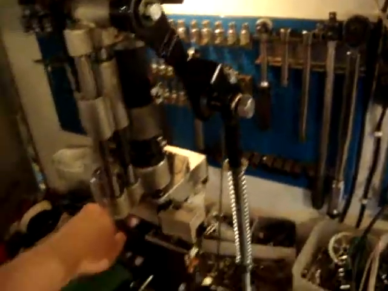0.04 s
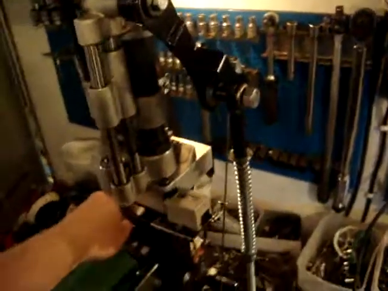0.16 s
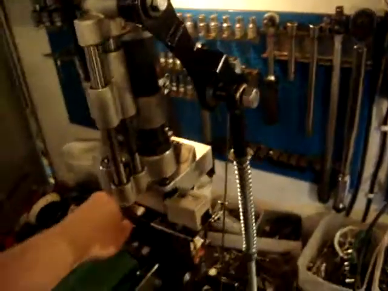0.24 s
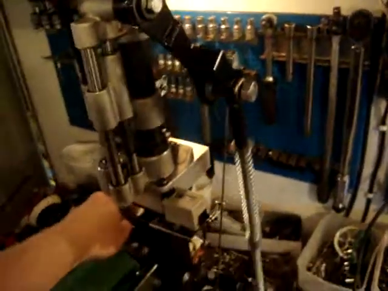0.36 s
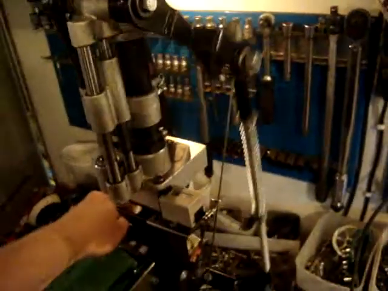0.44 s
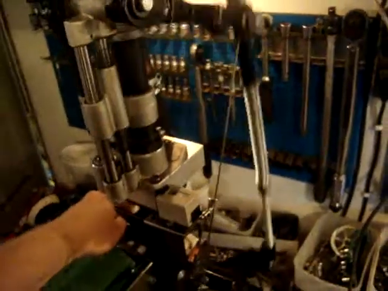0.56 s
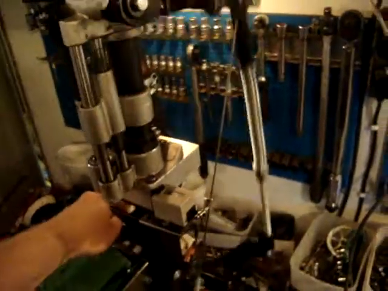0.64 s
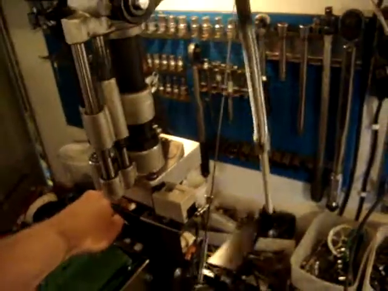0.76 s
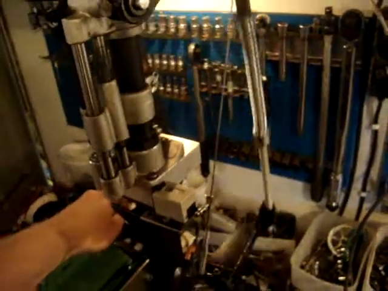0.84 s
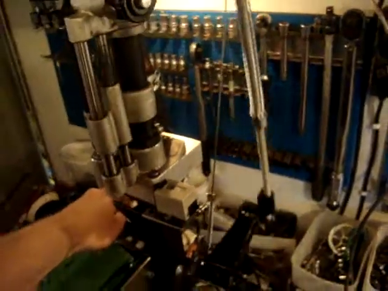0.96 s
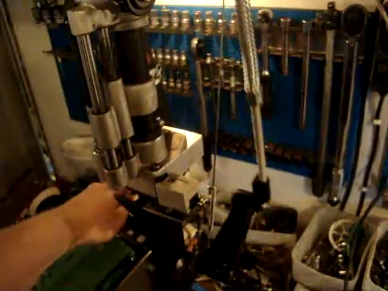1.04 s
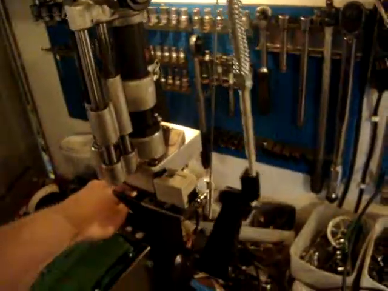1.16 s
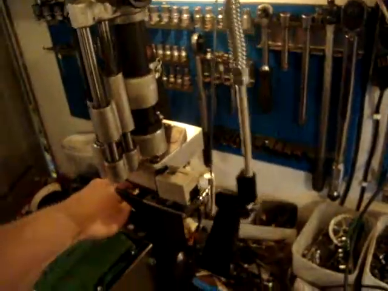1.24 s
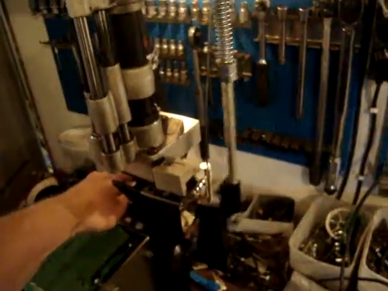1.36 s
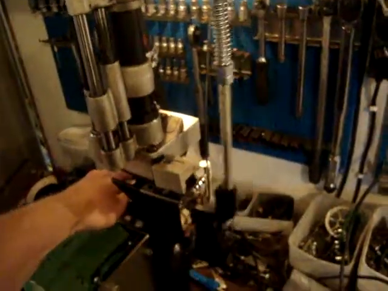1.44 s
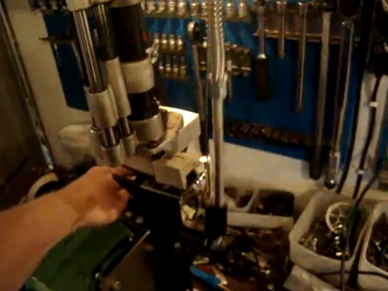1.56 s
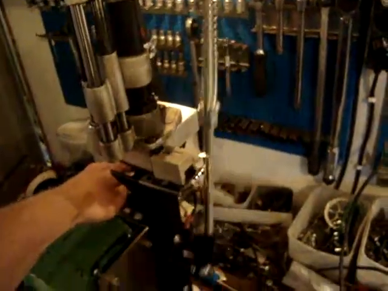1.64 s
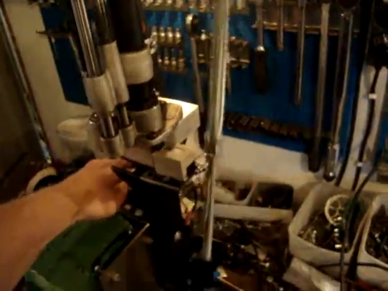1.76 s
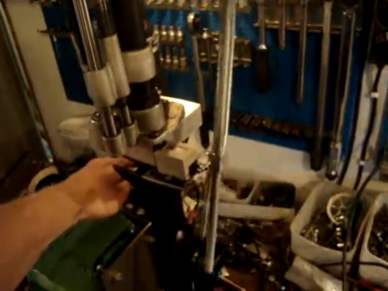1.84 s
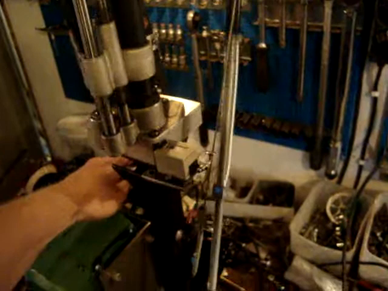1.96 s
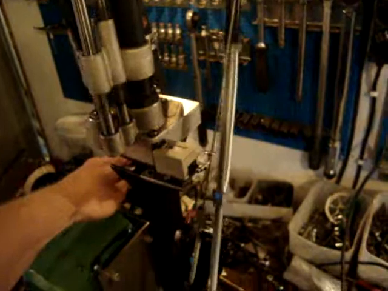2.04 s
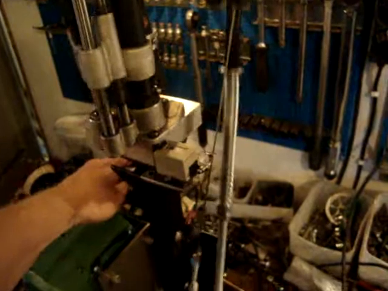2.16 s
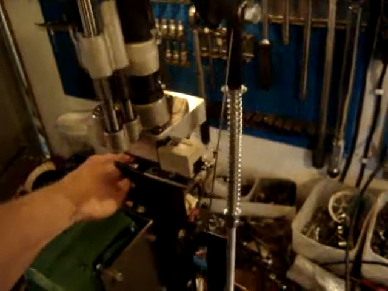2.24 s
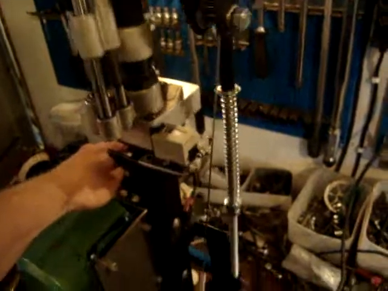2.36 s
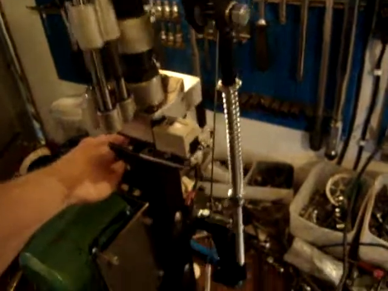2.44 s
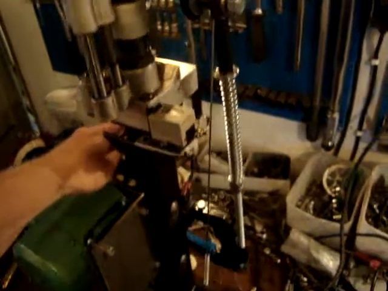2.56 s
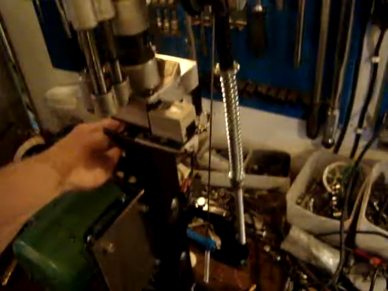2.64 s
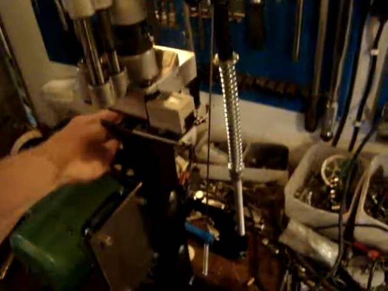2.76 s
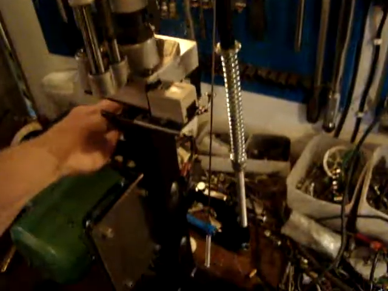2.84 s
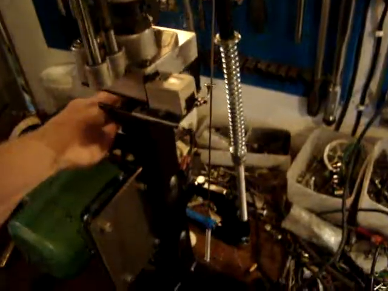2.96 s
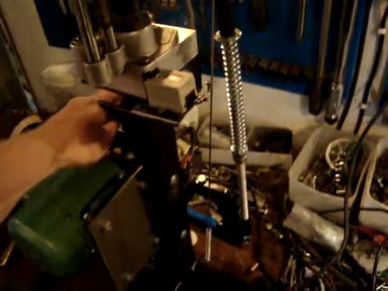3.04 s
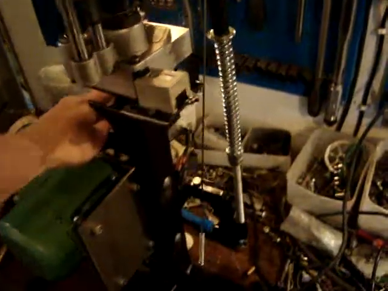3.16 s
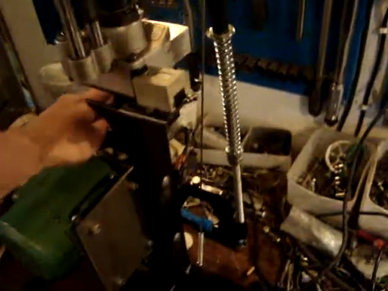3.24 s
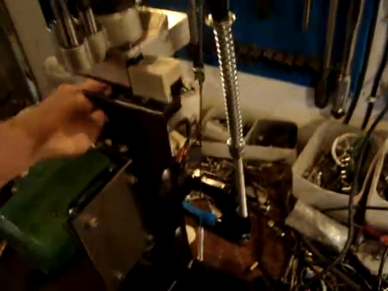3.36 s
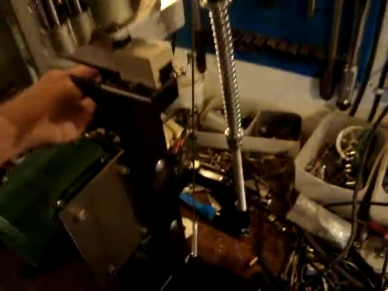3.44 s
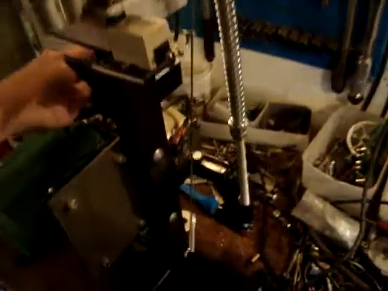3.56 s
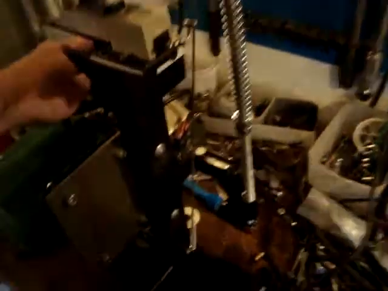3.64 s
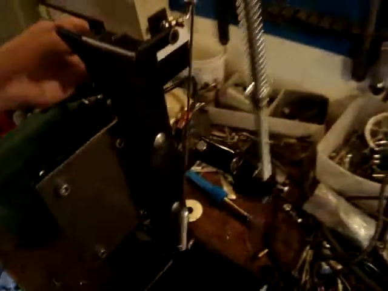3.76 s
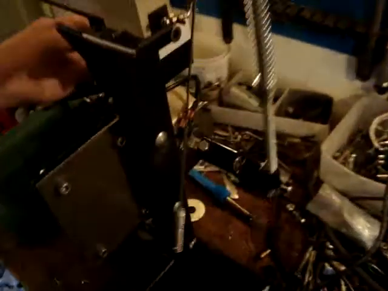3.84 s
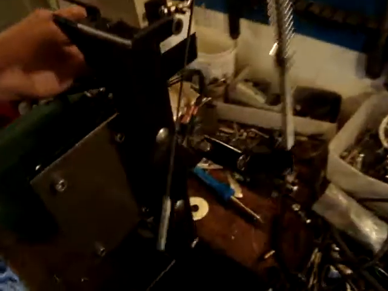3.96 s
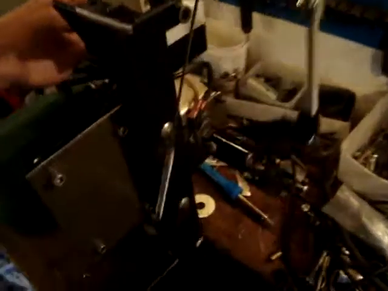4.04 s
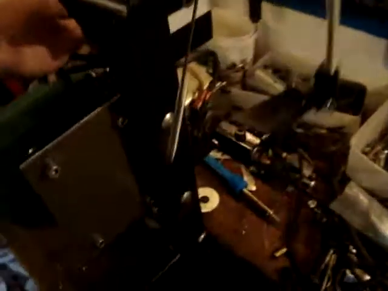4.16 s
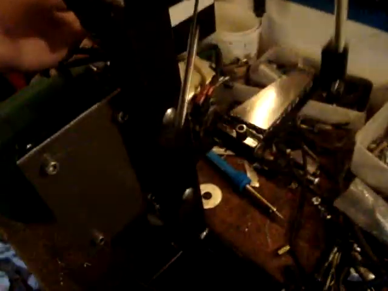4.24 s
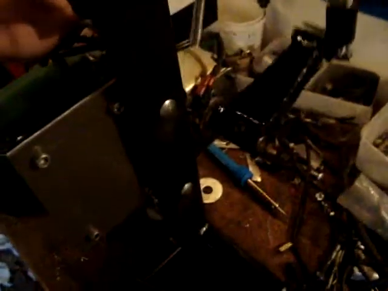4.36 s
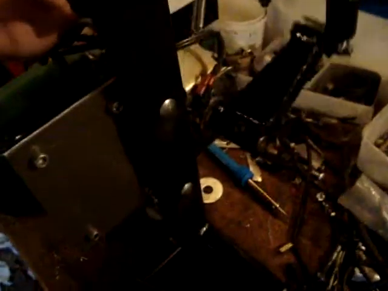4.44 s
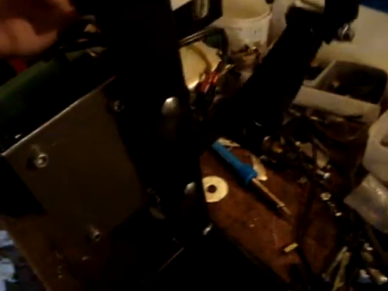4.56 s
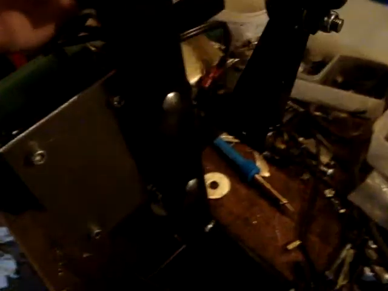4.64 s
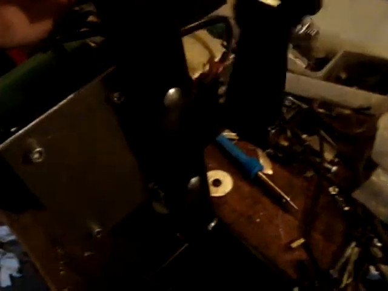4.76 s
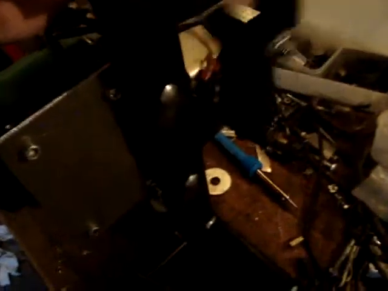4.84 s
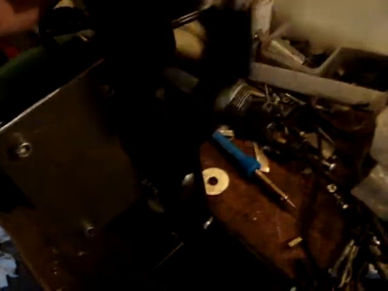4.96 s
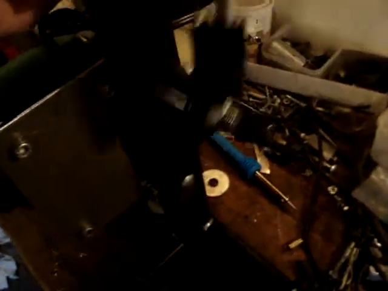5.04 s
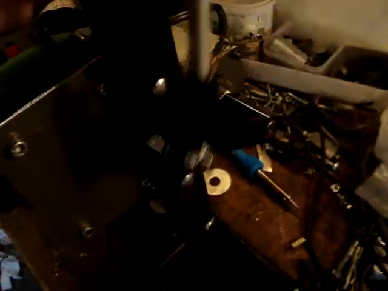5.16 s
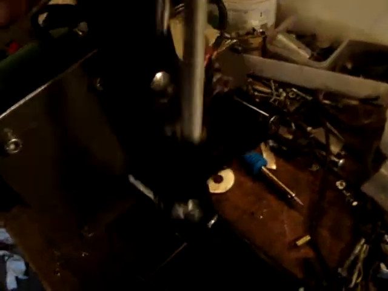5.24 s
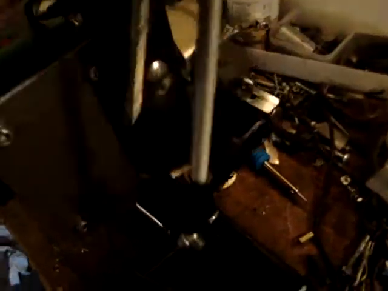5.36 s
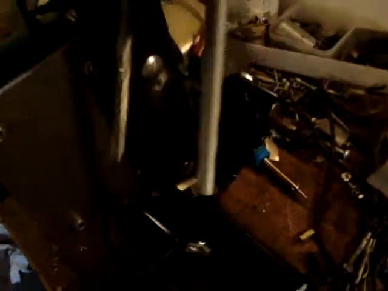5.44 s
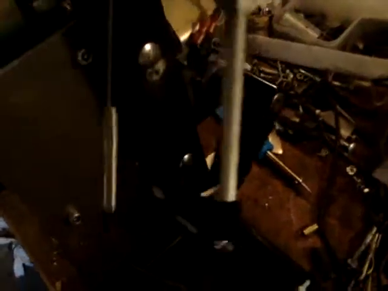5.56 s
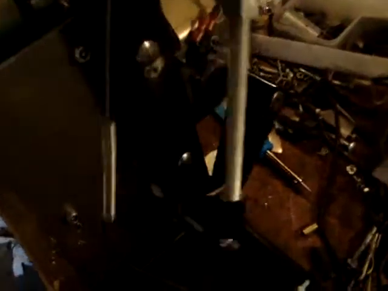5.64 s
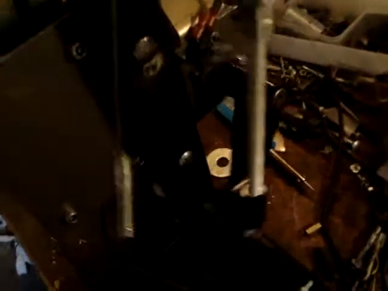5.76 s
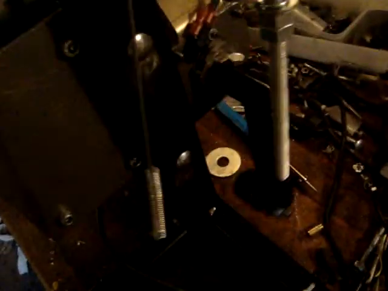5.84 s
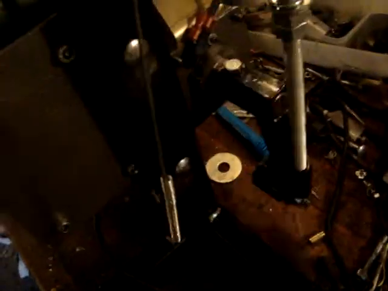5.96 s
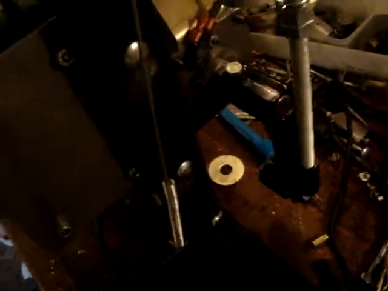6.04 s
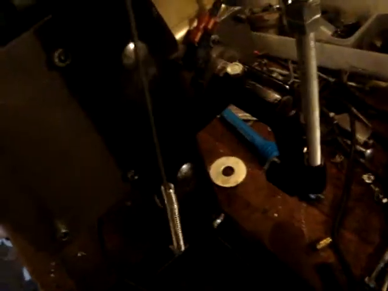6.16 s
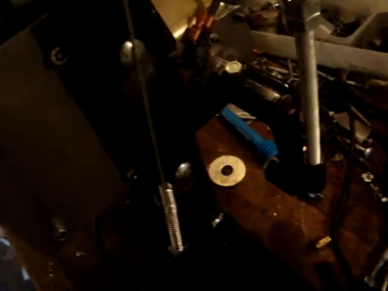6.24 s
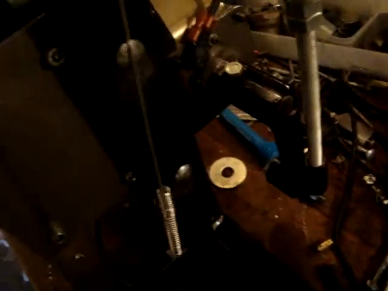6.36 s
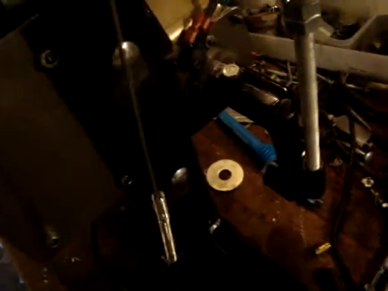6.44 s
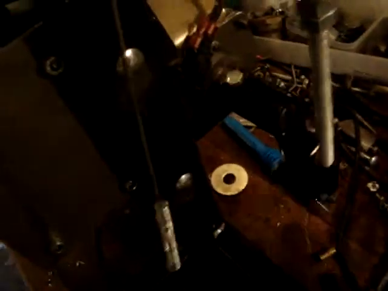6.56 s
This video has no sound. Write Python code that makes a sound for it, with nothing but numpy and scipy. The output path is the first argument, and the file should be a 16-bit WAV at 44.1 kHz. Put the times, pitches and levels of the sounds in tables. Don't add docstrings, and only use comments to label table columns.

```python
import sys
import numpy as np
from scipy import signal
from scipy.fft import rfft, irfft
from scipy.io import wavfile
from scipy.ndimage import uniform_filter1d, minimum_filter1d

SR = 44100
rng = np.random.default_rng(int(sys.argv[2]) if len(sys.argv) > 2 else 0)


def nominal_scale(level):
    x = np.asarray(level, float) / 20
    return 10 ** x


def master(y):
    cut = np.clip(np.atleast_2d(y).T, -1, 1)
    pcm = np.round(cut * 32767)
    wavfile.write(sys.argv[1], SR, pcm.astype(np.int16))


N = 291060
T = np.arange(N) / SR
MOVED_S = 3.2
ENGAGE_S, PRESS_S, RELEASE_S, CUT_S = .12, .79, 1.56, 2.26
# switch_on_s, rest_angle_turns, turns lost under load
STROKES = [
    (.18, 0, .31),
    (3.65, -3.58, .16),
    (6.52, -9.5, .2),
]
# after_switch_on_s, level_db
STILL = [(-.03, -25), (.013, -25), (.021, 0), (2.8, 0)]


def placed(far, near):
    return np.where(T < MOVED_S, far, near)


def unit(x):
    return x / np.sqrt(np.mean(x ** 2))


def unit_each_place(x):
    before, after = (np.sqrt(np.mean(x[part] ** 2)) for part in (T < MOVED_S, T >= MOVED_S))
    return x / placed(before, after)


def walk(rate):
    k = int(SR / rate)
    held = np.repeat(rng.standard_normal(N // k + 1), k)
    return unit(uniform_filter1d(uniform_filter1d(held, k), k)[:N])


def band(x, hz, width):
    return signal.lfilter(*signal.iirpeak(hz, hz / width, SR), x)


def ring(x, modes):
    y = 0
    for k, (hz, width, far_db, near_db) in enumerate(modes):
        y = y + (-1) ** k * nominal_scale(placed(far_db, near_db)) * band(x, hz, width)
    return unit_each_place(y)


def colour(x, points):
    hz, db = np.transpose(points[:-2])
    f = np.maximum(np.arange(N // 2 + 1) * SR / N, 1)
    return unit(irfft(rfft(x) * nominal_scale(np.interp(np.log(f), np.log(hz), db)), N))


def curves(tables, edge_s=0.0045):
    rows = np.vstack(tables)
    gate = sum((T >= t[0][0]) & (T <= t[-1][0]) for t in tables)
    return uniform_filter1d(1. * gate, int(edge_s * SR)), [np.interp(T, rows[:, 0], c) for c in rows.T[1:]]


def stroke_times(s):
    return np.hstack([on + s for on, _, _ in STROKES])


def cycle(rows):
    s, value = np.transpose(rows)
    return np.interp(T, stroke_times(s), np.tile(value, len(STROKES)))


def staged(dbs, step_s=0.0037):
    *stage, moved = dbs
    ends = [0, ENGAGE_S, PRESS_S, RELEASE_S, CUT_S, CUT_S + .5]
    rows = [(s, db) for a, b, db in zip(ends, ends[1:], stage) for s in (a, b - step_s)]
    return cycle(rows) + cycle(STILL) + moved * (T >= MOVED_S)


def effort():
    # time_s, casing_level_db
    powered = [
        [(.205, -30.5), (.27, -29.5), (.53, -27), (.96, -26.5), (.99, -24), (1.4, -28.5), (1.68, -26.5),
         (1.83, -31), (2.43, -29)],
        [(3.675, -34.5), (3.83, -27), (4.42, -25), (4.47, -21.5), (4.83, -30.5), (5.15, -28), (5.25, -33),
         (5.77, -28), (5.9, -29.5)],
        [(6.553, -27), (6.6, -32.5)],
    ]
    # from_first_effort_s, relative_db
    onset = [(-.027, -44), (-.02, -6.5), (-.006, -2)]
    # after_cut_s, relative_to_last_effort_db
    coast = [(.03, -1), (.18, -16), (.28, -32), (.37, -47)]

    def around(row, shape):
        return [(row[0] + s, row[1] + db) for s, db in shape]

    gate, (db,) = curves([around(e[0], onset) + e + around(e[-1], coast) for e in powered])
    return gate, db


def motor():
    # spin_up_db, lift_db, press_db, return_db, coast_db, added_second_place_db
    drone_stages = (-18.5, -8.5, -12, -14.5, -13.5, -2.5)
    cover_stages = (-12, -7, -7.5, -10, -14, 1.5)
    gears_stages = (-20, -6.5, -8, -6.5, -10.5, 1)
    gears_near_stages = (7, 1, 0.5, -2, -2.5, 0.5)
    casing_stages = (-0.5, 0.5, -0.5, -0.5, -1.5, -0.5)
    ring_stages = (-50, -49, -50, -50, -4.5, -0.5)
    # first_place_hz, second_place_hz
    ring_hz = (900, 883)
    # pitch_hz, width_hz, first_place_db, second_place_db
    casing_modes = [(888, 21.7, 6, -24), (957.4, 51.5, 0, -1.5), (838, 134, -10, 4.5), (1024, 91, -30, 2)]
    cover_modes = [(1134, 33, 8.5, 14), (1330, 19, -2.5, -16), (1244, 190, -0.5, 8)]
    gear_modes = [(1687, 121, -4, -7.5), (1903, 270, -6.5, -10), (2084, 54, 2.5, 0),
                  (2187, 25.6, 0.5, -1.5), (2365, 71, -9.5, -9.5)]
    base_modes = [(198, 56, -15.5, -11), (288.5, 29, -6, -5), (420.2, 35, 1.5, -0.5), (522, 90, -3, -1.5),
                  (637, 98, 2, 0)]
    # time_s, throb_depth
    throb = [
        [(.45, 0.044), (.56, 0.92), (.72, 0.56), (1.2, 0.1), (1.45, 0.68), (1.7, 0.3), (1.95, 0.74),
         (2.2, 0.72), (2.48, 0.42)],
        [(3.8, 0.48), (4.1, 0.54), (4.5, 0.46), (4.9, 0.5), (5.3, 0.29), (5.42, 0.59), (5.85, 0.55),
         (5.9, 0.04), (6.6, 0.14)],
    ]
    # after_switch_on_s, pull_0_to_1
    winding_pull = [(.04, 0.04), (.13, 0.73), (.77, 0.93), (.86, 0), (1.56, 0.16), (1.66, 0.2),
                    (2.22, 0.37), (2.3, 0.1)]
    # pitch_hz, level_db
    mains = [(50, -70), (100, -56.5), (200, -53), (300, -50.5)]

    gate, casing_db = effort()
    drone_db, cover_db, gears_db = (casing_db + staged(dbs) for dbs in (drone_stages, cover_stages, gears_stages))
    gears_db = gears_db + (T >= MOVED_S) * (staged(gears_near_stages) - cycle(STILL))

    angle = shaft()
    spot = (angle + .27) % 1
    uneven = nominal_scale(.6 * rng.standard_normal(170))[(angle + .6).astype(int)]
    strength = np.interp(T, *np.vstack(throb).T) * uneven
    hit = np.exp(-spot / 0.27)
    bounce = 0.22 * (spot > .3) * np.exp((.3 - spot) / 0.11)
    slack = .5 * np.exp((spot - 1) / 0.4)
    tight = strength * (hit + bounce - slack)

    def swell(share, flicker_db):
        g = np.exp(share * uniform_filter1d(tight, 90)) * nominal_scale(flicker_db * walk(70))
        return g / np.sqrt(uniform_filter1d(g ** 2, SR // 8))

    casing = ring(rattle(angle, .4, 2.5) * swell(.5, 1.2), casing_modes)
    casing = (.8 - .42 * np.minimum(strength, 1.2)) * casing
    coast_level = nominal_scale(staged(ring_stages) + 1.5 * walk(35) + 4.7 * np.cos(2 * np.pi * spot - .8))
    coast = coast_level * np.sin(2 * np.pi * placed(*ring_hz) * T + 0.91 * walk(30))
    casing = nominal_scale(staged(casing_stages) - cycle(STILL)) * casing + np.sqrt(2) * coast
    cover = ring(rattle(angle, 0.39, 1.7) * swell(1.72, 0.55), cover_modes)
    gears = ring(rattle(angle, 0.28, 2.45) * swell(placed(.4, 1.2), 0.7), gear_modes)
    pull = cycle(winding_pull)
    base = nominal_scale(-2.5) * ring(rattle(angle, 0.39, 2.7) * swell(2.4, 2.7), base_modes)
    base = nominal_scale(-5.0) * drone(angle, pull) + base

    sound = nominal_scale(casing_db) * casing + nominal_scale(drone_db) * base
    sound = sound + nominal_scale(cover_db) * cover + nominal_scale(gears_db) * gears
    hum = sum(nominal_scale(db + 0.79 * walk(5.9)) * np.sin(2 * np.pi * hz * T) for hz, db in mains)
    return gate * sound + knocks(casing_db) + pull * hum


def shaft():
    shaft_hz = 24.4
    s = np.array([0, ENGAGE_S, PRESS_S - .02, RELEASE_S, CUT_S, CUT_S + .1, CUT_S + .4])
    lead = [rest + np.array([.9, -.03, .04, .04 - slip, .21 - slip, -.25 - slip, -4.1 - slip])
            for _, rest, slip in STROKES]
    return shaft_hz * T + uniform_filter1d(np.interp(T, stroke_times(s), np.hstack(lead)), SR // 20)


def rattle(angle, repeat, spread_db, size=1800):
    fresh = rng.standard_normal((170, size)) * nominal_scale(spread_db * rng.exponential(size=size))
    turns = signal.lfilter([1], [1, -np.clip(repeat, 0, .97)], fresh, axis=0)
    return unit(turns[angle.astype(int), (angle % 1 * size).astype(int)])


def drone(angle, pull):
    # multiple, level_db
    far_lines = [(1, -58), (2, -28), (3, -30), (4, -39), (5, -16), (6, -15), (7, -24), (8, -12), (9, -8.5),
                 (10, -6.5), (11, -12.5), (12, -5), (13, -3.5), (14, -2.5), (15, -12), (16, -21), (17, 3.5),
                 (18, -3), (19, -5.5), (20, -40), (21, -2), (22, -6), (23, -11), (24, 6.5), (25, -13),
                 (26, -5), (27, -1), (28, 3)]
    near_lines = [(1, -34), (2, -31), (3, -30), (4, -16), (5, -11), (6, -15), (7, -11), (8, -2), (9, -7.5),
                  (10, -15), (11, -16), (12, -2.5), (13, -5.5), (14, -8.5), (15, -11), (16, -11), (17, -3),
                  (18, -10), (19, -13), (20, -8), (21, -24), (22, -9.5), (23, -29), (24, -15), (25, -21.5),
                  (26, -19), (27, -0.5), (28, -2)]
    out = 0
    for (k, far_db), (_, near_db) in zip(far_lines, near_lines):
        db = placed(far_db, near_db) + (1.2 if k < 14 else 2.8) * walk(4.77)
        force = 0.29 + pull if k < 9 else 1
        out = out + nominal_scale(db) * force * np.sin(2 * np.pi * (k * angle + rng.random()))
    return unit_each_place(out)


def knocks(casing_db, size=1600):
    # time_s, peak_db, ring_hz
    far_knocks = [(0.426, -23.5, 912), (0.488, -24.5, 934), (0.529, -16, 899), (0.566, -15, 891),
                  (0.605, -21, 912), (0.649, -15.5, 894), (0.689, -17, 939), (0.73, -19, 926),
                  (0.77, -17.5, 934), (0.812, -20.5, 942), (0.849, -19, 894), (0.896, -18.5, 907),
                  (0.933, -27, 937), (0.979, -15.5, 894), (1.023, -15, 969), (1.069, -17.5, 929),
                  (1.104, -20, 958), (1.148, -24.5, 980), (1.186, -17.5, 969), (1.273, -19, 904),
                  (1.319, -23, 877), (1.351, -26, 869), (1.391, -22, 945), (1.437, -20, 939),
                  (1.478, -18.5, 942), (1.52, -20, 934), (1.571, -23, 1000), (1.606, -22, 872),
                  (1.645, -17.5, 937), (1.691, -20, 880), (1.729, -19, 964), (1.765, -28, 923),
                  (1.802, -32, 958), (1.848, -26, 883), (1.889, -22.5, 931), (1.93, -23, 939),
                  (1.97, -23, 939), (2.009, -26.5, 891), (2.05, -22, 912), (2.089, -23, 886),
                  (2.127, -30, 891), (2.167, -22, 896), (2.21, -29, 942), (2.249, -25, 888),
                  (2.288, -27, 937), (2.333, -25, 883), (2.372, -29, 894), (2.418, -25.5, 883)]
    near_knocks = [(3.783, -23.5, 848), (3.823, -22.5, 960), (3.881, -23, 840), (3.957, -20, 878),
                   (4.041, -19.5, 975), (4.072, -20.5, 899), (4.109, -19, 969), (4.151, -17.5, 886),
                   (4.191, -16, 884), (4.232, -20.5, 877), (4.273, -19.5, 840), (4.313, -19, 956),
                   (4.353, -18, 796), (4.436, -16.5, 961), (4.486, -13.5, 953), (4.531, -19, 958),
                   (4.595, -16.5, 992), (4.665, -17.5, 953), (4.696, -19, 956), (4.736, -17.5, 897),
                   (4.772, -23, 800), (4.812, -23, 860), (4.853, -23.5, 958), (4.895, -18, 936),
                   (4.937, -20, 931), (4.993, -19, 890), (5.021, -23, 870), (5.063, -22, 891),
                   (5.105, -21, 874), (5.144, -23, 902), (5.188, -22, 952), (5.228, -27.5, 829),
                   (5.266, -29, 848), (5.309, -26, 890), (5.346, -25.5, 840), (5.39, -24.5, 929),
                   (5.431, -23, 878), (5.474, -23.5, 873), (5.513, -23.5, 898), (5.552, -19, 903),
                   (5.593, -21.5, 880), (5.635, -22, 912), (5.674, -18.5, 885), (5.715, -24.5, 855),
                   (5.756, -16, 870), (5.797, -18.5, 894), (5.838, -20, 877), (5.878, -25.5, 865),
                   (5.918, -21, 930), (5.963, -24.5, 912)]
    rise_s, fall_s, rebound_s = 0.00281, 0.0069, .013
    rebound, over_db = 0.28, 4
    out, t = np.zeros(N + size), np.arange(size) / SR

    def bump(s):
        return np.exp(-((t - s) / np.where(t < s, rise_s, fall_s)) ** 2)

    for (s, db, hz), (late, turn, back) in zip(far_knocks + near_knocks, rng.random((120, 3))):
        rattle_level = nominal_scale(casing_db[int(s * SR)] + over_db)
        peak = np.sqrt(max(nominal_scale(db) ** 2 - rattle_level ** 2, 0))
        shape = bump(2 * rise_s) * np.sin(2 * np.pi * (hz * t + turn))
        second = bump(2 * rise_s + rebound_s * (0.73 + .4 * late)) * np.sin(2 * np.pi * (hz * t + late))
        shape = shape + 2 * rebound * back * second
        out[int((s - rise_s) * SR):][:size] += peak * shape
    return out[:N]


def grit(spread_db):
    return unit(rng.standard_normal(N) * nominal_scale(spread_db * rng.exponential(size=N)))


def ram():
    # loudest_s, level_db, rise_s, fall_s (rise and fall over 20 dB)
    bite_list = [(.21, -42.5, 0.0085, 0.11), (0.309, -27, 0.0049, 0.007), (.985, -30.5, 0.0096, 0.33),
                 (1.03, -24.5, 0.037, .1), (1.069, -23.5, 0.057, 0.019), (1.11, -30.5, 0.056, 0.11),
                 (1.152, -24.5, 0.0092, 0.24), (1.22, -29.5, 0.15, 0.23), (1.55, -27, 0.064, 0.23),
                 (1.671, -23.5, 0.091, 0.095), (1.73, -31, 0.048, 0.051), (2.425, -44, 0.018, 0.13),
                 (3.676, -35.5, 0.011, 0.032), (3.723, -36.5, 0.041, 0.019), (3.773, -53, 0.0061, .1),
                 (4.456, -27, 0.018, 0.42), (4.538, -30.5, 0.17, 0.02), (4.62, -29, 0.031, 0.26),
                 (4.67, -29, 0.076, 0.16), (4.74, -32.5, 0.091, 0.13), (5.0, -30.5, 0.05, 0.37),
                 (5.09, -33, 0.25, .1), (5.142, -26.5, 0.072, 0.044), (5.19, -39, 0.016, 0.059),
                 (5.22, -35.5, .1, 0.019), (5.885, -41, .02, 0.065), (6.551, -26.5, 0.0055, 0.021)]
    # spin_up_db, lift_db, press_db, return_db, coast_db, added_second_place_db
    rub_stages = (-26, -17.5, -23, -18, -22.5, 0.5)
    frame_stages = (-14.5, -12, -10, -13, -20.5, 1.5)
    # pitch_hz, width_hz, first_place_db, second_place_db
    frame_modes = [(2696, 590, 3.5, 2.5), (3091, 66, 11.5, 12.5), (3363, 160, 4, 2),
                   (4120, 190, -0.5, -1.5), (5000, 220, -1, -4)]
    guide_modes = [(1358, 52, -1.5, 0.5), (1670, 18, -0.5, 3), (449, 67, -7.5, -12)]
    # pitch_hz, level_db (per Hz)
    scrape_colour = [(1760, -35), (3000, -9), (3520, -1), (3980, -0.5), (4530, 1.5), (5020, -2), (6680, -2),
                     (9560, -6.5), (10000, -19), (13000, -44), (22000, -120)]

    gate, effort_db = effort()
    bites = 0
    for s, db, rise, fall in bite_list:
        away = np.maximum((s - T) / max(rise, .002), (T - s) / max(fall, .005))
        bites = bites + nominal_scale(db - 20 * away) ** 2
    scrape = np.sqrt(bites + nominal_scale(effort_db + staged(rub_stages)) ** 2)
    shake = np.sqrt(bites * nominal_scale(-7) ** 2 + nominal_scale(effort_db + staged(frame_stages)) ** 2)
    load = np.clip((20 * np.log10(scrape) + 50) / 18, .25, 1)
    patchy = nominal_scale(load * (.5 * walk(30) + 1.5 * walk(80) + 1.6 * walk(260)))
    frame = shake * ring(grit(3.46), frame_modes) + nominal_scale(-6.5) * scrape * ring(grit(0.93), guide_modes)
    return gate * (scrape * patchy * colour(grit(1.9), scrape_colour) + patchy ** .4 * frame)


def clicks(blows, q, rise_s, soften_db, snap, size=6000):
    out, t = np.zeros(N + size), np.arange(size) / SR
    for s, db, hz, treble_db, t60 in blows:
        fade = np.exp(-np.log(1000) * t / max(t60, .005)) * np.minimum(t / rise_s, 1)
        burst = rng.standard_normal((2, size)) * fade
        burst[:, int(rise_s * SR)] += snap
        body = band(band(burst[0], hz, hz / q), hz, 2 * hz / q)
        crack = band(band(burst[1], 6400, 5500), 5600, 7000)
        blow = body / np.abs(body).max() + nominal_scale(treble_db) * crack / np.abs(crack).max()
        out[int(s * SR):][:size] += nominal_scale(db - soften_db) * blow
    return out[:N]


def relays():
    # time_s, peak_db, ring_hz, treble_over_peak_db, fade_60_db_s
    snaps = [(0.205, -18, 1870, -6, 0.053), (0.3045, -16, 5700, -18, 0.011),
             (0.9824, -14, 2840, -33, 0.065), (1.1469, -17, 1330, -26, 0.25), (1.444, -21, 2220, -2, 0.047),
             (1.5111, -15.5, 1380, -0.5, 0.023), (1.722, -14.5, 1740, -6.5, 0.039),
             (2.2216, -22, 1700, -28, 0.053), (2.2993, -28, 2080, -32, 0.052),
             (2.4139, -23.5, 2060, 0.5, 0.09), (2.4387, -17, 1640, -31, 0.13),
             (3.668, -19.5, 1830, -14, 0.07), (3.7689, -11, 5500, -6.5, 0.03),
             (4.4483, -8.5, 2030, -33, 0.053), (4.9746, -19, 3000, 0, 0.03),
             (5.1223, -11.5, 6750, -7, 0.017), (5.1831, -17, 2560, 2, 0.085),
             (5.323, -22.5, 1970, -1, 0.048), (5.876, -20, 2900, -1.5, 0.052),
             (5.898, -14, 2660, -31, 0.098), (6.547, -8.5, 1290, -31, 0.017),
             (6.5515, -19, 1160, -28, 0.036), (1.4831, -23.5, 4000, 2.5, .015),
             (1.6642, -15, 5000, -1, .02), (4.6064, -16, 5550, -6, 0.021), (4.907, -24.5, 4000, -6, .02),
             (4.9411, -26, 5000, -4, .02), (5.128, -14, 6500, -10, .012), (5.1415, -12.5, 6000, -8, .015),
             (5.0369, -18, 5000, -3, 0.018), (5.3078, -40, 5000, -11, 0.012),
             (4.437, -12.5, 940, -30, 0.062)]
    return clicks(snaps, q=1.44, rise_s=0.0025, soften_db=1.9, snap=0)


def fingers():
    # time_s, peak_db, ring_hz, treble_over_peak_db, fade_60_db_s
    tap_list = [(.206, -20, 1810, -32, 0.061), (.232, -26, 1750, -30, .04), (6.549, -18, 1250, -30, .04),
                (6.58, -27, 1700, -30, .05), (.061, -42, 2680, -15, 0.04),
                (3.2025, -17.5, 1440, -24, 0.014), (3.2025, -25.5, 1940, -30, .011),
                (3.2025, -23, 3640, -21, 0.0081), (3.2025, -47, 6060, -26, 0.01),
                (3.203, -37.5, 605, -30, 0.036), (3.204, -50, 200, -27, .08),
                (6.392, -35.5, 545, -33, 0.023), (6.391, -41, 1900, -20, .015),
                (6.4475, -31.5, 3170, -24, 0.033), (6.4505, -39, 3100, -18, 0.027),
                (6.448, -37, 1310, -32, 0.054), (6.483, -47, 520, -30, 0.07), (6.51, -43, 1310, -33, 0.086)]
    return clicks(tap_list, q=2.8, rise_s=.0004, soften_db=0, snap=9)


def squeals():
    # start_s, loudest_s, end_s, pitch_hz, level_db
    tones = [(.201, 0.215, 0.24, 905, -27), (6.535, 6.54, 6.57, 970, -25), (4.47, 4.51, 4.62, 4070, -36),
             (0.27, .29, 0.42, 2020, -42.5), (1.485, 1.69, 1.71, 1360, -30), (1.18, 1.2, 1.35, 1310, -32.5),
             (4.85, 4.96, 4.985, 2165, -34), (4.58, 4.62, 4.69, 1700, -36), (1, 1.105, 1.22, 965, -29),
             (4.44, 4.5, 4.7, 945, -26), (3.67, 3.74, 3.82, 850, -37.5), (3.88, 3.97, 4.02, 865, -28.5)]
    waver, flicker_db = 1.35 * walk(45), 2.4 * walk(60)
    out = 0
    for k, (start, top, end, hz, db) in enumerate(tones):
        shift = 9000 * k
        level = nominal_scale(db + np.roll(flicker_db, shift)) * np.interp(T, [start, top, end], [0, 1, 0]) ** 0.69
        out = out + level * np.sqrt(2) * np.sin(2 * np.pi * hz * T + np.roll(waver, shift))
    return out


def bench():
    # time_s, level_db
    thuds = [
        (.99, -33),
        (1.03, -22.5),
        (1.725, -48),
        (4.46, -38),
        (4.75, -44),
        (5.0, -51),
        (5.191, -43),
        (5.9, -51),
        (6.59, -31),
    ]
    return sum(nominal_scale(db) * (T - s) / 0.0067 * np.exp(-((T - s) / 0.0019) ** 2) for s, db in thuds)


def bird():
    # time_s, pitch_hz, level_db
    whistles = [
        [(2.9, 4402, -81), (2.924, 4350, -59), (3.036, 4645, -72), (3.102, 4780, -58), (3.14, 4190, -77)],
        [(3.25, 4380, -71), (3.298, 4405, -69), (3.32, 4487, -79)],
        [(2.83, 2570, -77), (2.848, 2300, -56), (2.87, 2393, -71)],
    ]
    gate, (hz, db) = curves(sorted(whistles), edge_s=.015)
    return gate * np.sqrt(2) * nominal_scale(db) * np.sin(2 * np.pi * np.cumsum(hz) / SR)


def room():
    # pitch_hz, level_db (per Hz)
    hiss_colour = [(15, -50.5), (25, -28), (211, -10), (251, -7), (404, -4.5), (447, -3.5), (795, -4),
                   (857, -6.5), (1190, -6), (2280, -12), (4600, -13.5), (5210, -14.5), (10000, -18.5),
                   (13000, -53), (22000, -120)]
    # time_s, level_db
    hiss_level = [(0, -56), (.15, -53.5), (2.75, -56.5), (2.9, -54.5), (3.6, -55), (6.25, -58), (6.6, -54)]
    level_db = np.interp(T, *np.transpose(hiss_level)) + 0.34 * walk(1.9)
    return nominal_scale(level_db) * colour(rng.standard_normal(N), hiss_colour)


def scene():
    press = motor() + ram() + relays() + fingers() + squeals() + bench()
    return (press + bird() + room())[None]


def lose_weak_treble(x, top_hz, size=512):
    # start_s, length_s, lost_above_hz
    gaps = [(.312, .012, 5200), (1.132, .014, 7500), (1.412, .024, 6500), (1.468, .012, 7500),
            (2.385, .026, 5200), (4.434, .01, 5200), (4.88, .02, 9000), (4.926, .012, 7200),
            (4.948, .008, 7800), (4.964, .008, 6000), (5.305, .014, 6000), (6.42, .024, 2800)]
    f, t, z = signal.stft(x, SR, nperseg=size)
    power = np.abs(z) ** 2 + 1e-18
    loud_db = 10 * np.log10(power.sum(axis=0))
    ahead_db = -minimum_filter1d(-loud_db, size=5, origin=-2)
    short_db = rng.exponential(1.5, z.shape[1])
    band_hz = 690
    for lo in np.arange(1500, top_hz, band_hz):
        rows = (f >= lo) & (f < lo + band_hz)
        band_db = 10 * np.log10(power[rows].sum(axis=0))
        below_db = .4 * (ahead_db - band_db) + 1.45 * (ahead_db - loud_db)
        luck_db = short_db + np.repeat(rng.exponential(5.5, z.shape[1]), 2)[:z.shape[1]]
        lost = .5 * below_db + luck_db * min(lo / 5500, 1) ** 2 > 22
        z[rows] *= np.where(lost, .03, 1)
        if lo > 4800:
            z[rows] *= np.where(power[rows] < .45 * power[rows].mean(axis=0), .1, 1.05)
    for s, length, hz in gaps:
        z[np.ix_(f > hz, (t >= s) & (t <= s + length))] *= .03
    return signal.istft(z, SR, nperseg=size)[1][:N]


def roll_off(x):
    return signal.sosfilt(signal.butter(12, 10510, fs=SR, output="sos"), x)


def record(dry):
    top_hz = 10120
    rounded = .45 * np.tanh(dry[0] / .45)
    thinned = lose_weak_treble(rounded, top_hz)
    low_pass = signal.ellip(12, .2, 90, top_hz, fs=SR, output="sos")
    mix = signal.sosfilt(low_pass, thinned)[None]
    return roll_off(mix)


dry = scene()
out = record(dry)
master(out)
```